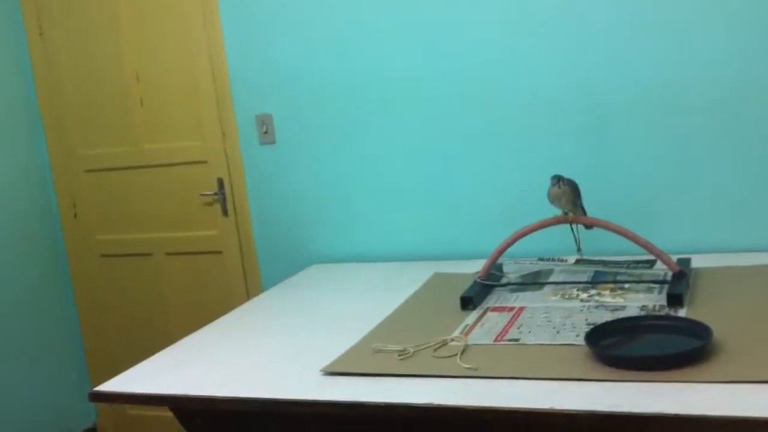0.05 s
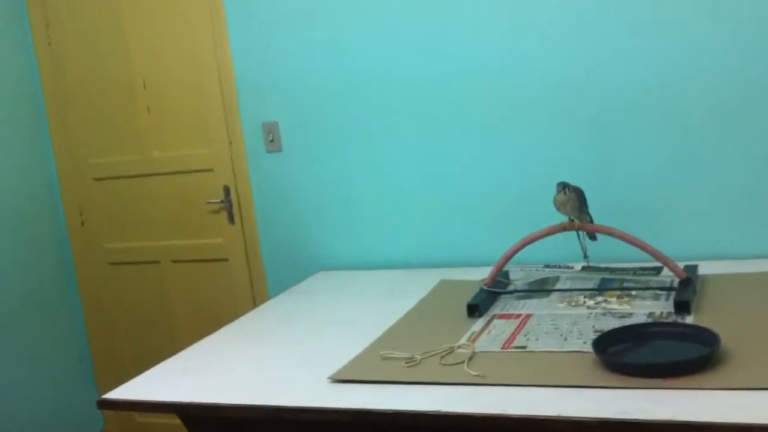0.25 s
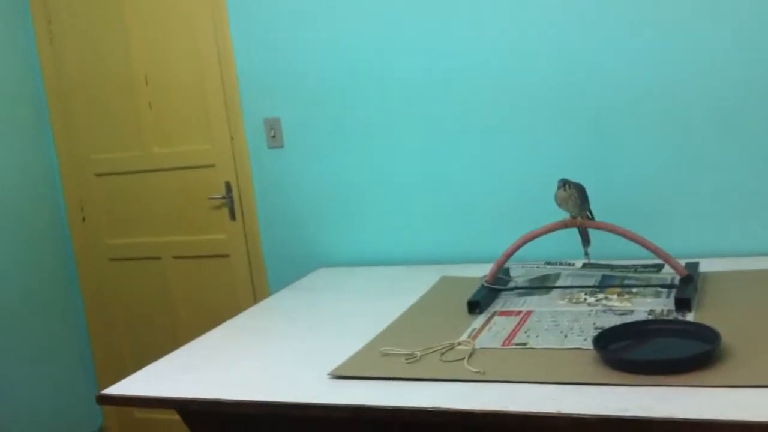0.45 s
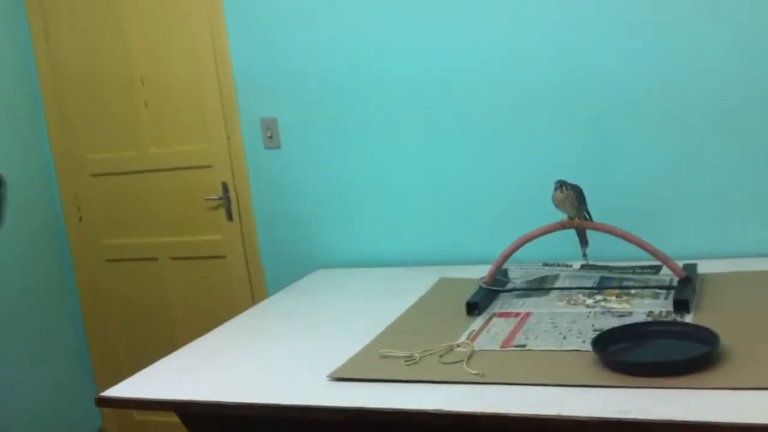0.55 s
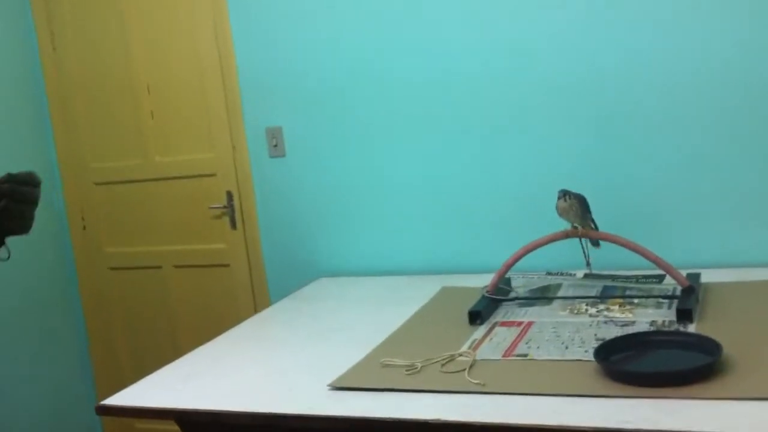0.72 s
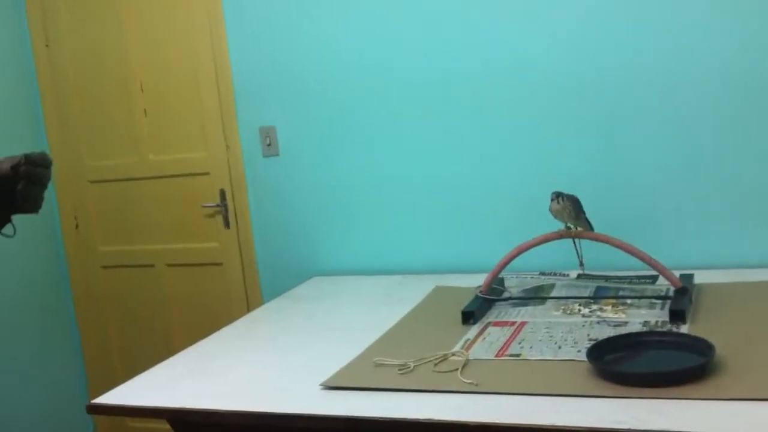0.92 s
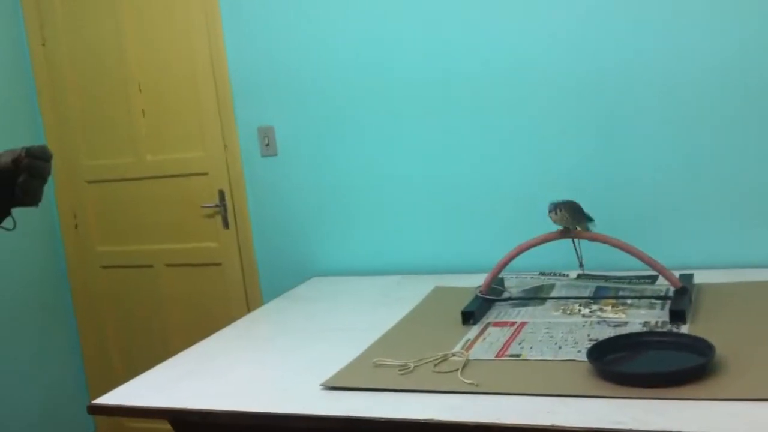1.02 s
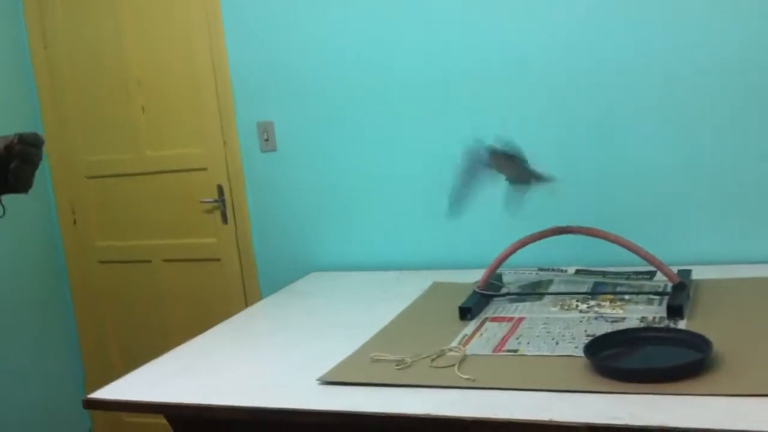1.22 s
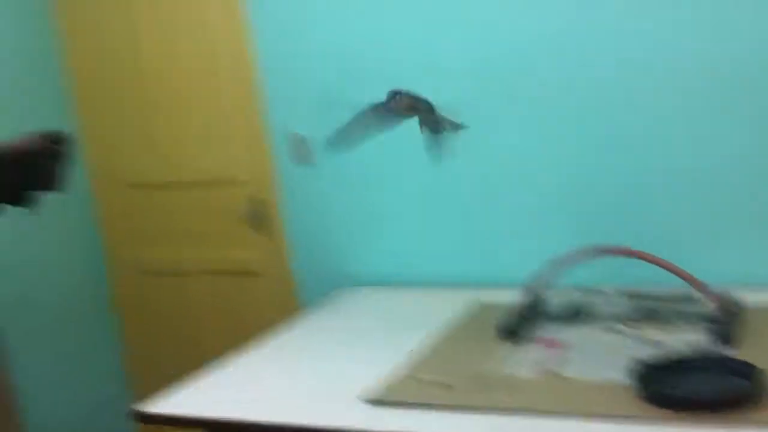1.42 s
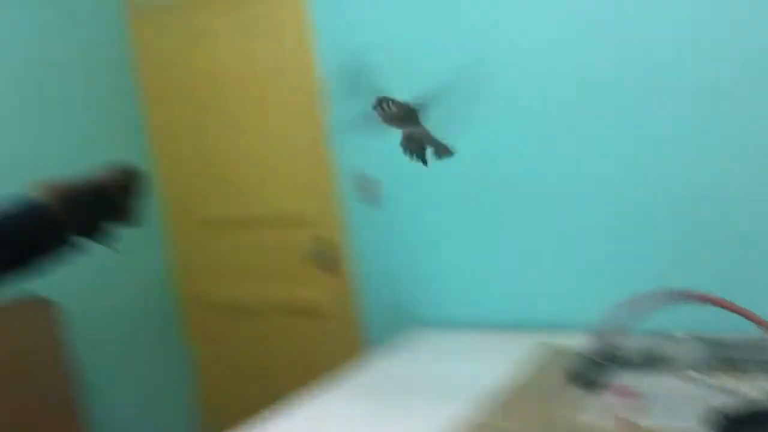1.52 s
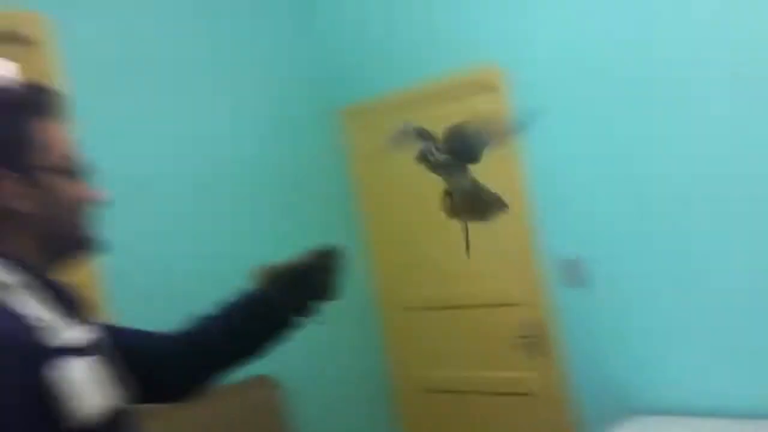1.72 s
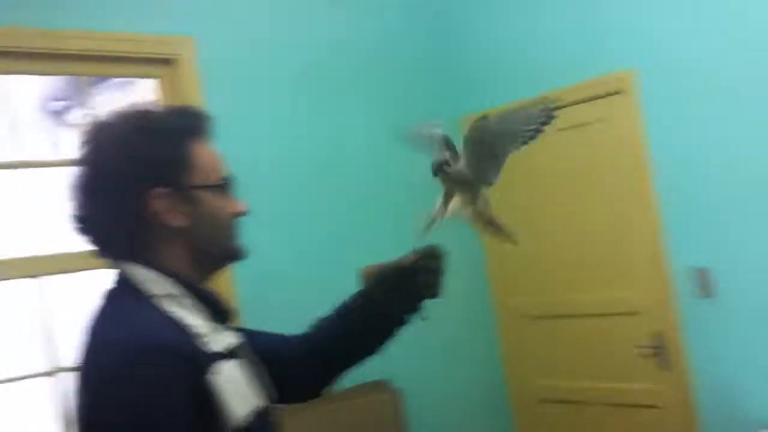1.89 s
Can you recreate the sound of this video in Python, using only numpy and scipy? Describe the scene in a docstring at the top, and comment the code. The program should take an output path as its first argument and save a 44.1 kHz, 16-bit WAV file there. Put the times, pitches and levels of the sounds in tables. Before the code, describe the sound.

A young falcon gives one loud, sharp chirp, then a string of thin, wavering begging whines that grow louder and raspier. Its wings stir the air faintly as it takes off, close by in a small, bare room.

```python
"""Young falcon begging in a bare room

A perched falcon gives one loud, arched chirp, a whistle shaped by its throat, amid a string of thin,
wavering begging whines. The whines grow louder, rasp and crack as it flies off towards a glove.
Its wings stir the air faintly and the hard walls of the small room ring after every note."""
import sys
import numpy as np
from scipy import signal
from scipy.fft import rfft, irfft, next_fast_len
from scipy.io import wavfile
from scipy.ndimage import uniform_filter1d, map_coordinates

SR = 44100
rng = np.random.default_rng(int(sys.argv[2]) if len(sys.argv) > 2 else 0)


def output_pcm(signal):
    """Save a mono or channel-first signal as 16-bit PCM at the path in sys.argv[1].

    Samples are clipped to [-1, 1] before scaling.
    """
    pcm = np.clip(np.atleast_2d(signal).T, -1, 1) * 32767
    wavfile.write(sys.argv[1], SR, np.round(pcm).astype(np.int16))


N = 85995
JITTER_PER_S, WAVER_PER_S = 620, 70  # pace of the voice's fast and slow unsteadiness


def chirp():
    """A clean whistle arches up through the throat resonance and drops away; hiss marks its start."""
    # pitch arch: time_s, pitch_hz
    arch = [(.085, 1120), (.092, 1309), (.099, 1803), (.106, 1960), (.12, 2121), (.136, 2126), (.15, 2094),
            (.155, 1971), (.168, 2003), (.179, 1952), (.189, 1385)]
    # loudness contour: time_s, level_db
    contour = [(.083, -17), (.089, -18.5), (.094, -18.5), (.108, -6.5), (.122, -5), (.15, -5.5), (.164, -5),
               (.171, -8.5), (.188, -36), (.196, -72.5)]
    # harmonics ahead of the throat, fundamental first: level_db
    partials_db = [1, 1.5, -15, -14.5, -7]
    # throat resonance with the beak open: frequency_hz, gain_db
    throat = [(1100, -68), (1400, -14.5), (1900, -7), (2150, -2.5), (2500, -4), (3000, -15), (4200, -27.5),
              (6300, -23), (8400, -22.5), (10600, -30.5), (15000, -52)]
    # colour of the hiss: frequency_hz, density_db
    hiss_colour = [(300, -26), (1000, -11), (2000, 6.5), (3000, 0.5), (4500, 5.5), (6500, -9), (7300, -8),
                   (8500, 1), (12000, 3.5), (15500, -10)]
    t = clock()
    pitch_hz = curve(arch) * (1 + .0022 * wobble(JITTER_PER_S))
    phase = 2 * np.pi * np.cumsum(pitch_hz) / SR
    start_s, end_s = contour[0][0], contour[-1][0]
    envelope = amp(curve(contour)) * gate(start_s, end_s - start_s, attack_s=.004, release_s=.004)
    flare_db = 16 * np.exp(-.5 * ((t - .1504) / .006) ** 2)  # harmonic 4 flares as the pitch falls
    tone = np.zeros(N)
    for k, partial_db in enumerate(partials_db, 1):
        tone += amp(partial_db + along(throat, k * pitch_hz) + flare_db * (k == 4)) * np.sin(k * phase)
    hiss = amp(-32.5) * gate(.091, .013, attack_s=.0035, release_s=.11) * noise(hiss_colour)
    return np.sqrt(2) * envelope * tone + hiss


def whines():
    """Thin notes rich in overtones on shallow arcs of pitch: a pure core inside a trembling tone."""
    # begging notes: start_s, length_s, start_hz, middle_hz, end_hz, level_db,
    # brightness_db_per_octave, jitter_percent
    notes = [(-.008, 0.11, 2084, 2179, 2178, -36, -2.5, 1.5),
             (0.169, 0.086, 2152, 2233, 2094, -44.5, -2, 1.73),
             (.31, 0.2, 2128, 2198, 2120, -53, -5.5, 1.476),
             (0.419, .08, 2134, 2125, 2126, -41.5, -3.5, 1.1),
             (0.493, .19, 2080, 2092, 2168, -38, -4, 0.45), (.68, 0.058, 2200, 2246, 2225, -35, -3.5, 0.37),
             (.745, .11, 2215, 2223, 2238, -47, -7, 1), (0.879, .04, 2113, 2115, 2215, -39.5, -5.5, 1.3),
             (.913, .177, 2250, 2292, 2253, -32, -4, 0.76), (1.087, 0.064, 2245, 2186, 2175, -32, -3, 1.57),
             (1.144, .11, 2200, 2215, 2180, -53.5, -11, 1.2),
             (1.35, 0.045, 2213, 2104, 2160, -45, -6, 0.49), (1.392, 0.15, 2172, 2188, 2196, -26, 0.5, 1),
             (1.555, .065, 2185, 2169, 2143, -24, -2, 1.2), (1.625, 0.11, 2220, 2142, 2178, -39, -5.5, 1.1),
             (1.776, 0.16, 2235, 2267, 2284, -27.5, 2.5, 1)]
    # harmonics of the voice, fundamental first: level_db
    partials_db = [-16.5, -4, -4, -11.7, -9.5, -12.5, -16]
    # boost or cut on the fundamental: time_s, gain_db
    fundamental_ride = [(.5, 5), (1.1, -3), (1.4, -8), (1.46, 6.5), (1.53, -9), (1.575, 0), (1.62, -11.5),
                        (1.75, -5), (1.81, 8)]
    # the third harmonic stands out in the soft, low notes: time_s, gain_db
    third_ride = [(.45, 0.5), (.53, 9), (.72, 2.5), (.82, -1.5)]
    # the voice cracks into half-pitch overtones: centre_s, length_s, relative_db
    cracks = [(1.905, 0.09, -14.5)]
    t, out, crack = clock(), np.zeros(N), swells(cracks)
    colour_db = np.zeros((len(partials_db), N))
    colour_db[0], colour_db[2] = curve(fundamental_ride), curve(third_ride)
    for start_s, length_s, start_hz, middle_hz, end_hz, level_db, tilt_db, jitter_percent in notes:
        parabola = np.polyfit([0, .5, 1], [start_hz, middle_hz, end_hz], 2)
        arc_hz = np.polyval(parabola, np.clip((t - start_s) / length_s, 0, 1))
        droop = .0079 * np.clip((t - start_s - length_s) / .019 + 1, 0, 2) ** 2  # sags as it lets go
        core_hz = arc_hz * (1 + .002 * wobble(WAVER_PER_S) - droop)
        rough_hz = core_hz * (1 + jitter_percent / 100 * trembling())
        shimmer_db = 2.5 * wobble(per_s=240)
        envelope = amp(level_db + shimmer_db) * gate(start_s, length_s, attack_s=.021, release_s=.02)
        on = envelope > 0
        core_phase, rough_phase = 2 * np.pi * np.cumsum([core_hz[on], rough_hz[on]], axis=1) / SR
        for k, partial_db in enumerate(partials_db, 1):
            core = amp(2 - 4 * k) * np.cos(k * core_phase)
            crack_db = -10.5 if k == 1 else -8.5 * (k - 2)  # strongest just above harmonic 2
            cracked = crack[on] * amp(crack_db) * np.sin((k + .5) * rough_phase)
            gain = amp(partial_db + colour_db[k - 1, on] + tilt_db * np.log2(k / 2))
            out[on] += np.sqrt(2) * envelope[on] * gain * (np.sin(k * rough_phase) + core + cracked)
    return out


def trembling(limit=2.5, steady_share=.37, steady_s=.024):
    """Fast, uneven pitch slips that the voice partly takes back at once."""
    slips = wobble(JITTER_PER_S) * amp(2 * wobble(WAVER_PER_S))
    slips = limit * np.tanh(slips / limit)
    return slips - steady_share * uniform_filter1d(slips, int(steady_s * SR))


def rasps(edge_s=.03):
    """Short hoarse patches of noise where the voice strains in the loud whines."""
    # moments of strain: start_s, length_s, level_db
    strains = [(1.495, 0.052, -50.5), (1.773, 0.031, -48.5), (1.797, 0.037, -57)]
    # colour of the rasp: frequency_hz, density_db
    colour = [(2500, -45), (3800, -30), (4700, -12), (5300, -3), (5900, -4), (7100, -20.5), (7800, -40),
              (9500, -33), (12000, -24), (15000, -18.5)]
    envelope = sum(amp(db) * gate(start_s, length_s, edge_s, edge_s) for start_s, length_s, db in strains)
    return envelope * noise(colour)


def wings():
    """Each wingbeat pushes a soft puff of air."""
    # wingbeats: centre_s, length_s, level_db
    beats = [(1.33, .09, -59.5), (1.435, 0.079, -57), (1.58, 0.13, -63.5), (1.76, 0.29, -64.5)]
    # colour of a puff: frequency_hz, density_db
    colour = [(30, -31.5), (90, -18), (200, -3.5), (450, -7), (900, -12), (3000, -17), (8000, -20.5),
              (15000, -23)]
    return swells(beats) * noise(colour)


def rustles():
    """Faint, low rustles before the flight."""
    # rustles: centre_s, length_s, level_db
    stirs = [(.02, 0.16, -62), (.22, 0.039, -58), (.31, 0.22, -59.5), (.76, 0.094, -62.5)]
    # colour of a rustle: frequency_hz, density_db
    colour = [(30, -22.5), (90, -20), (180, 0.5), (350, 3), (800, -7.5), (2000, -10), (8000, -20)]
    return swells(stirs) * noise(colour)


def room(x, first_echo_s=.0025, build_s=.019):
    """The bare walls' reverb builds up quickly and rings longest in the upper mids."""
    # ring time of the room: frequency_hz, t60_s
    ring_times = [(200, 0.21), (2000, 0.63), (4500, 0.67), (8000, 0.54), (15000, 0.41)]
    hz, t, spectrum = signal.stft(rng.standard_normal(SR), SR, nperseg=256)
    decay = amp(-60 * t / along(ring_times, hz)[:, None])
    build = np.clip((t - first_echo_s) / build_s, 0, 1)
    tail = signal.istft(spectrum * decay * build, SR, nperseg=256)[1]
    return signal.fftconvolve(x, tail / np.linalg.norm(tail))[:N]


def air():
    """Still room air, a low and steady bed."""
    # colour of the room tone: frequency_hz, density_db
    colour = [(25, -28.5), (70, -28), (110, -12.5), (170, -1), (300, -4.5), (600, -7.5), (1200, -13),
              (3000, -15), (15000, -34)]
    return amp(-70) * noise(colour)


def amp(db):
    """Decibels to gain."""
    return 10 ** (np.asarray(db) / 20)


def clock():
    """Time of each sample in seconds."""
    return np.arange(N) / SR


def curve(points):
    """An automation curve through (time_s, value) points."""
    return np.interp(clock(), *np.transpose(points))


def along(points, hz):
    """Read (frequency_hz, value) points on a log frequency axis."""
    points_hz, values = np.transpose(points)
    return np.interp(np.log(hz + 1), np.log(points_hz + 1), values)


def wobble(per_s):
    """A smooth random curve with per_s knots a second."""
    return map_coordinates(rng.standard_normal(N // 4), [clock() * per_s], mode="wrap")


def filtered(x, response):
    """Equalise x by a gain that is a function of frequency."""
    size = next_fast_len(N + SR // 2)
    return irfft(rfft(x, size) * response(np.fft.rfftfreq(size, 1 / SR)), size)[:N]


def noise(colour):
    """Noise of rms 1, shaped by (frequency_hz, density_db) points."""
    x = filtered(rng.standard_normal(N), lambda hz: amp(along(colour, hz)))
    return x / np.sqrt(np.mean(x ** 2) + 1e-20)


def gate(start_s, length_s, attack_s, release_s):
    """Rise smoothly, hold until start_s + length_s, fall."""
    age_s = clock() - start_s
    rise = np.clip(age_s / attack_s, 0, 1)
    fall = np.clip(1 - (age_s - length_s) / release_s, 0, 1)
    return np.sin(np.pi / 2 * rise * fall) ** 2


def swells(rows):
    """Bell-shaped swells from (centre_s, length_s, level_db) rows."""
    t = clock()
    return sum(amp(db) * np.exp(-2 * ((t - centre_s) / length_s) ** 2) for centre_s, length_s, db in rows)


def scene():
    """The falcon's voice and its reverb over faint air, rustles and wingbeats, in mono."""
    call, begging = chirp(), whines() + rasps()
    call_in_room = call + amp(-10.5) * room(call)
    begging_in_room = amp(-2.5) * begging + amp(-5) * room(begging)
    return (call_in_room + begging_in_room + air() + rustles() + wings())[None]


def record(dry):
    """A brick-wall low-pass trims the very top of the treble."""
    return filtered(dry[0], lambda hz: hz < 15800)[None]


dry = scene()
out = record(dry)
output_pcm(out)
```